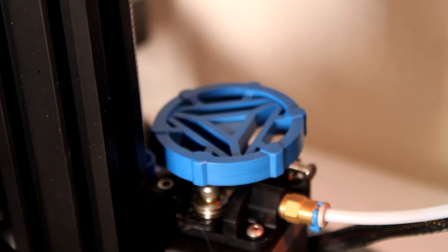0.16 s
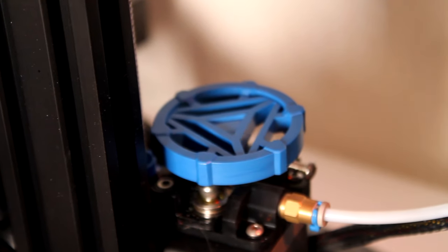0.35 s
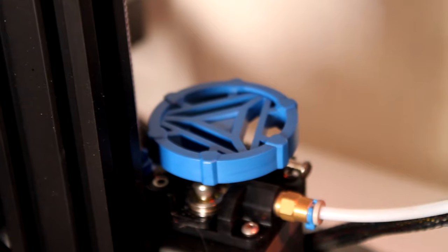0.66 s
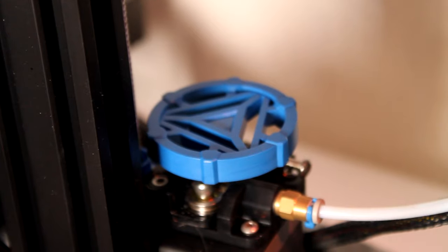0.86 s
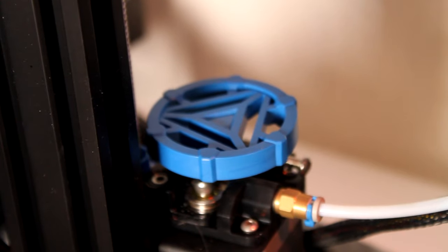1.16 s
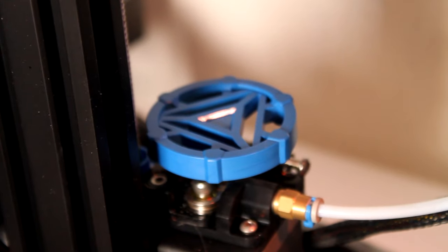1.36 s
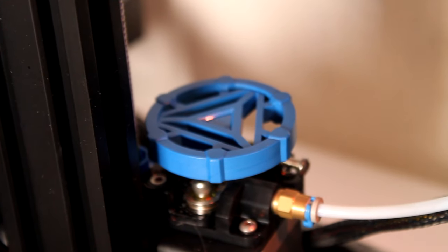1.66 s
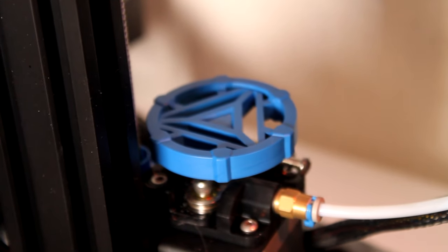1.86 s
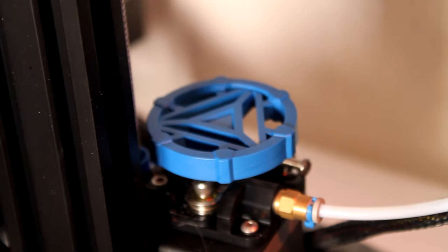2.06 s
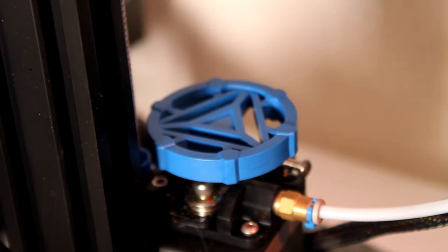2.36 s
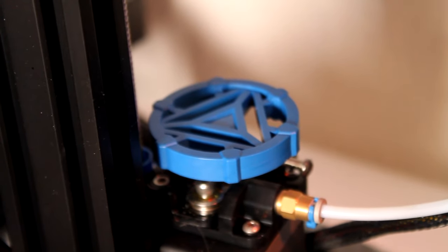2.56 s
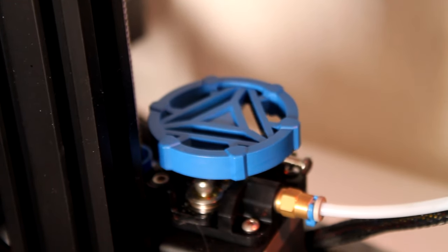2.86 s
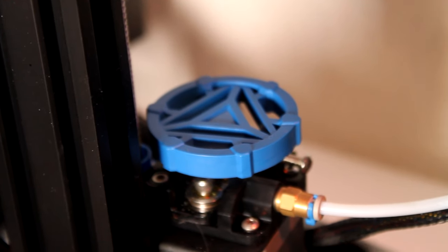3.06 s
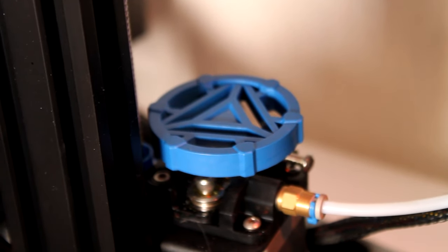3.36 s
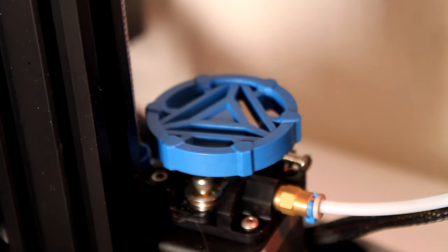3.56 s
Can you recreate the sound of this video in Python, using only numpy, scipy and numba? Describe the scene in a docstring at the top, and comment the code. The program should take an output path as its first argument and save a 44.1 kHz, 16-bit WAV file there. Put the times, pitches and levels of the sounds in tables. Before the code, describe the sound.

Small cooling fans run throughout, a close, dry, mono rush of air with a buzzy mid-pitched hum and faint high whines, rising slightly in level at the start. At about 1.1 s a slipping gear snaps sharply, bright and metallic with tiny rebounds and a short hollow thud; another follows at about 2.0 s. After each, the fan noise ducks briefly and creeps back, continuing steadily until 3.5 s.

```python
"""Several small fans of a desktop printer run steadily, close to a mono microphone: air rush is noise
coloured by housing resonances; motor and blade tones are multiples of slightly wandering speeds.
Twice the filament drive skips a tooth: bursts of contacts ring metal modes, then the frame thuds in sines.
Behind lie a lone hum that swells and fades and faint high whines.
The recorder's gain control ducks after each skip and creeps back; it starts still ducked."""
import sys
import numpy as np
from scipy import signal
from scipy.fft import rfft, irfft
from scipy.io import wavfile
from numba import njit

SR = 44100
rng = np.random.default_rng(int(sys.argv[2]) if len(sys.argv) > 2 else 0)


def nominal_scale(level):
    """Amplitude ratio for a level in decibels (scalar or array-like)."""
    x = np.asarray(level, float) / 20
    return 10 ** x


def pcm_store(signal):
    """Save signal as 16-bit PCM."""
    levels = np.round(np.clip(np.atleast_2d(signal), -1, 1) * 32767)
    wavfile.write(sys.argv[1], SR, levels.astype(np.int16).T)


N = 163611  # length in samples


def unit(x):
    """Scale to rms 1."""
    return x / np.sqrt(np.mean(x ** 2) + 1e-20)


def drift(rate_hz):
    """Slow random wander of rms 1: noise through two equal low-pass poles, made at SR / 40."""
    pole = np.exp(-2 * np.pi * rate_hz * 40 / SR)
    noise = rng.standard_normal(N // 40 + 2002)
    slow = signal.lfilter([1], [1, -2 * pole, pole * pole], noise)[2000:]  # settled part
    return np.interp(np.arange(N) / 40, np.arange(len(slow)), unit(slow - slow.mean()))


def coloured(spectrum, peaks=()):
    """Noise with a spectrum and bell-shaped boosts or dips; rms 1."""
    hz = np.arange(N // 2 + 1) * SR / N + 1  # 1 Hz up, so that the log exists
    points = np.array(spectrum)
    db = np.interp(np.log(hz), np.log(points[:, 0]), points[:, 1])
    for peak_hz, width_hz, boost_db in peaks:
        db = db + boost_db / (1 + (2 * (hz - peak_hz) / width_hz) ** 2)
    return unit(irfft(rfft(rng.standard_normal(N)) * nominal_scale(db), N))


def ring(x, hz, t60):
    """A resonator: a unit click sets a dying sine of starting height 1 ringing."""
    radius = nominal_scale(-60 / (t60 * SR))
    angle = 2 * np.pi * hz / SR
    return signal.lfilter([0, np.sin(angle)], [1, -2 * radius * np.cos(angle), radius * radius], x + 1e-18)


def air():
    """Turbulent rush through the fan housings, flickering a little, ending at the top of the band."""
    # broad spectrum of the rush, relative: f/Hz, density/dB
    rush_spectrum = [(18, -65), (30, -24.5), (85, -27.5), (130, -23), (231, -22), (270, -16), (342, -7.5),
                     (444, -17.5), (548, -9.5), (608, -7.5), (770, -12), (855, -10.5), (924, -11.5),
                     (1230, -9), (1440, -12.5), (1560, -12), (2250, -14.5), (2500, -15.5), (2770, -15),
                     (3700, -14.5), (6410, -27), (12700, -39), (15600, -46)]
    # housing resonances and dips the rush passes through: f/Hz, width/Hz, boost/dB
    housing = [(141, 31, 10), (337, 39, 3.5), (647, 48, 3), (689, 76, 7.5), (853.6, 48, 8.5),
               (1018, 38, 6.5), (1142, 62, 3), (1575, 41, 3.5), (1857, 52, 7.5), (2534, 70, 4.5),
               (2740, 120, -0.5), (3940, 100, -5), (4400, 100, 0.5), (7030, 240, -0.5), (7800, 580, 2.5),
               (9340, 350, -3.5), (10470, 1100, 4), (12300, 500, 1.5), (13100, 800, 3.5), (14300, 200, 7),
               (15200, 900, 3)]
    level_db, flicker_db, flicker_hz = -26, 0.58, 13.4
    top_cut = signal.ellip(12, .5, 60, 15650, fs=SR, output="sos")  # edge in Hz
    rush = signal.sosfilt(top_cut, coloured(rush_spectrum, housing))
    return nominal_scale(level_db + flicker_db * drift(flicker_hz)) * rush


def fan(turn_hz, tones, waver_db=0.4):
    """Multiples of one slightly wandering speed, each wavering in level on its own."""
    speed_wander = 0.00044  # share of the speed, rms
    turns = np.cumsum(turn_hz * (1 + speed_wander * drift(1.51))) / SR
    out = np.zeros(N)
    for multiple, db in tones:
        level = np.sqrt(2) * nominal_scale(db + waver_db * drift(11.4))  # dB is rms
        out += level * np.sin(2 * np.pi * (multiple * turns + rng.random()))
    return out


def fan_tones():
    """Motor and blade tones of four fans, each a set of harmonics of its turning rate."""
    # tones of each fan: multiple of the turning rate, level/dB rms
    slow_fan = [(3, -55.5), (4, -40.5)]
    board_fan = [(4, -47.5), (5, -33.5), (9, -43.5), (18, -59), (20, -51)]
    hot_end_fan = [(12, -45), (14, -55.5), (16, -48.5), (22, -47.5), (24, -49.5), (25, -55.5), (28, -45),
                   (29, -55), (30, -49), (32, -52.5), (36, -55.5)]
    blower = [(5, -53), (8, -43.5), (10, -43), (15, -58), (16, -48)]
    # turning rates in Hz
    return fan(71.03, slow_fan) + fan(122.8, board_fan) + fan(132.82, hot_end_fan) + fan(156.22, blower)


def contact_clicks():
    """Metal contacts as scattered clicks of either sign and uneven height."""
    per_s, spread_db = 6000, 4.
    happens = rng.random(N) < per_s / SR
    height_db = spread_db * np.minimum(rng.exponential(1, N), 3)
    return happens * rng.choice([-1, 1], N) * nominal_scale(height_db)


def gear():
    """Each burst is a dying rattle of contacts into the gear's modes, with a broad crack."""
    # modes of gear, lever and spring: f/Hz, relative level/dB
    modes = [(1700, -8), (2500, -8.5), (3130, -5.5), (3800, -9), (4330, 0), (4800, 1), (5100, -1),
             (5500, -1.5), (6300, -8), (6700, 0), (7350, -18), (8300, -9), (10650, -8), (11100, -11),
             (11650, -15), (13300, -8), (14100, -12), (14900, -15)]
    # broad crack around the modes, relative: f/Hz, density/dB
    crack_spectrum = [(880, -14.5), (1500, -3), (3520, -0.5), (4290, 0.5), (5940, -6.5), (6630, -4),
                      (9100, -12), (13300, -5), (16000, -31)]
    # bursts, the slip and its rebounds: t/s, relative level/dB, decay length/s, brightness/dB per octave
    bursts = [(1.0728, -16.5, 0.00089, -1), (1.0738, -8, 0.001, -0.5), (1.0792, -14, 0.005, -6),
              (1.088, -21, .003, 3), (1.102, -24, .004, 3), (1.9837, -11, 0.0048, -2.),
              (1.9854, -22.5, 0.0055, 8.5), (1.993, -39, .004, -3), (1.994, -20.5, 0.0066, -11),
              (2.01, -21, 0.0083, 1.5), (2.023, -31, .003, 6)]
    rise_s, modes_db, mode_t60_s = .0006, -4.5, .032
    crack_db, crack_t60_s, split_hz = -8, 0.079, 9100  # crack_db holds for a burst of -13 dB
    crack_loss = .6  # softer contacts crack less, dB per dB
    hiss = coloured(crack_spectrum)
    low = signal.sosfilt(signal.butter(2, split_hz, "low", fs=SR, output="sos"), hiss)
    high = signal.sosfilt(signal.butter(2, split_hz, "high", fs=SR, output="sos"), hiss)
    contacts = contact_clicks()
    out = np.zeros(N)
    t = np.arange(SR // 4) / SR
    rise = 1 - np.exp(-t / rise_s)
    for start_s, db, length_s, bright_db in bursts:
        at = int(start_s * SR)
        now = slice(at, at + len(t))
        rattle = contacts[now] * rise * np.exp(-t / length_s)
        rattle = rattle / np.sqrt(np.sum(rattle ** 2) + 1e-20)  # energy 1
        hit = np.zeros(len(t))
        for hz, mode_db in modes:
            tilt_db = bright_db * np.log2(hz / 4000)
            hit += nominal_scale(modes_db + mode_db + tilt_db) * ring(rattle, hz, mode_t60_s)
        # the crack holds for the burst's length, then dies away
        fade_db = -60 * np.maximum(t - length_s, 0) / crack_t60_s
        crack_level = nominal_scale(crack_db + crack_loss * (db + 13) + fade_db)
        crack = (low[now] - nominal_scale(2 * bright_db) * high[now]) * rise * crack_level
        out[now] += nominal_scale(db) * (hit + crack)
    return out


def frame():
    """The frame's modes swell a little after each skip, die at their own rates and sink in pitch."""
    # skips of the drive gear, which shake the frame: t/s, level/dB
    skips = [(1.0729, -9.5), (1.9834, -10.5)]
    # thud modes: settled f/Hz, relative level/dB, t60/s, delay/s
    thud_modes = [(163.5, -9.5, 0.11, 0.028), (333, -1, 0.053, 0.0092), (507, -2, 0.16, 0.003),
                  (1070, -8.5, 0.14, 0.009), (1590, -14, 0.056, 0.00072)]
    swell_s = 0.0039
    sag, sag_s = .2, 0.0121  # the thud starts sharp by this share and settles
    out = np.zeros(N)
    t = np.arange(SR // 2) / SR
    for start_s, db in skips:
        at = int(start_s * SR)
        for hz, mode_db, t60_s, delay_s in thud_modes:
            late = np.maximum(t - delay_s, 0)
            cycles = hz * np.cumsum(1 + sag * np.exp(-t / sag_s)) / SR
            swell = 1 - np.exp(-late / swell_s)
            level = nominal_scale(db + mode_db - 60 * late / t60_s) * swell
            out[at:at + len(t)] += level * np.sin(2 * np.pi * cycles)
    return out


def hum():
    """A lone hum at 350.5 Hz, a single sine that swells and fades by chance."""
    return fan(350.5, [(1, -40.5)], waver_db=3.)


def whines():
    """Faint high whines, sines that share one slightly wandering rate."""
    # whines: multiple of 0.98 Hz, level/dB rms
    high_tones = [(4025, -58), (4423, -58), (5271, -60), (5896, -61), (6109, -64), (7703, -66)]
    return fan(0.98, high_tones)


def scene():
    """All sources reach one microphone, laid on two equal channels."""
    mono = air() + fan_tones() + gear() + frame() + hum() + whines()
    return np.stack([mono, mono])


@njit
def follow(wanted_db, start_db, down, up):
    """Gain falls quickly towards the wanted value and rises slowly."""
    gain_db, now = np.empty(len(wanted_db)), start_db
    for i in range(len(wanted_db)):
        now += (wanted_db[i] - now) * (down if wanted_db[i] < now else up)
        gain_db[i] = now
    return gain_db


def gain_control(x):
    """The recorder senses the smoothed power and pulls down what exceeds a threshold."""
    sense_s, threshold_db = 0.06, -25.5
    squeeze = 1  # dB of cut wanted per dB above the threshold
    duck_s, recover_s, start_db = 0.014, 0.33, -9.0
    smooth = np.exp(-1 / (sense_s * SR))
    power = signal.lfilter([1 - smooth], [1, -smooth], x[0] ** 2)
    level_db = 10 * np.log10(power + 1e-12)
    wanted_db = -squeeze * np.maximum(level_db - threshold_db, 0)
    gain_db = follow(wanted_db, start_db, 1 / (duck_s * SR), 1 / (recover_s * SR))
    return x * nominal_scale(gain_db)


def band_limit(x):
    """A steep low-pass at the top of the band."""
    return signal.sosfilt(signal.butter(12, 16640, fs=SR, output="sos"), x)


def record(dry):
    """The microphone's low cut, the gain control, then peaks rounded towards a ceiling."""
    low_cut = signal.butter(4, 28, "high", fs=SR, output="sos")  # corner in Hz
    levelled = gain_control(signal.sosfilt(low_cut, dry))
    ceiling = 1.1
    rounded = ceiling * np.tanh(levelled / ceiling)
    return band_limit(rounded)


dry = scene()
out = record(dry)
pcm_store(out)
```